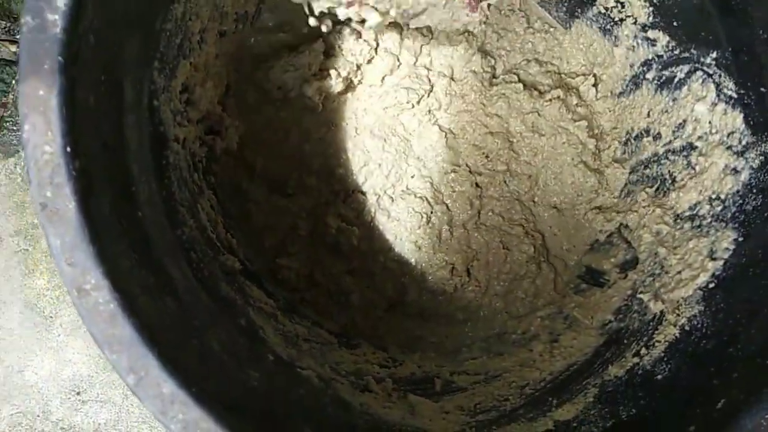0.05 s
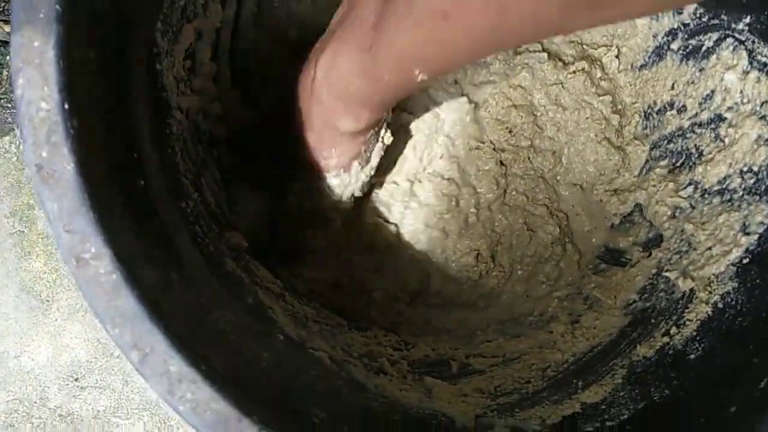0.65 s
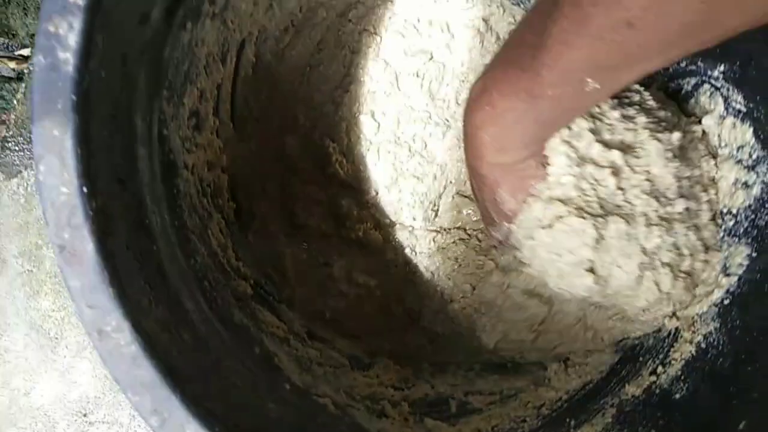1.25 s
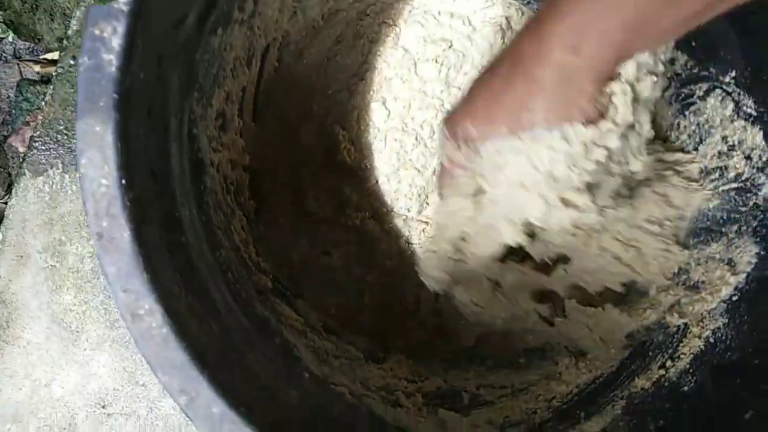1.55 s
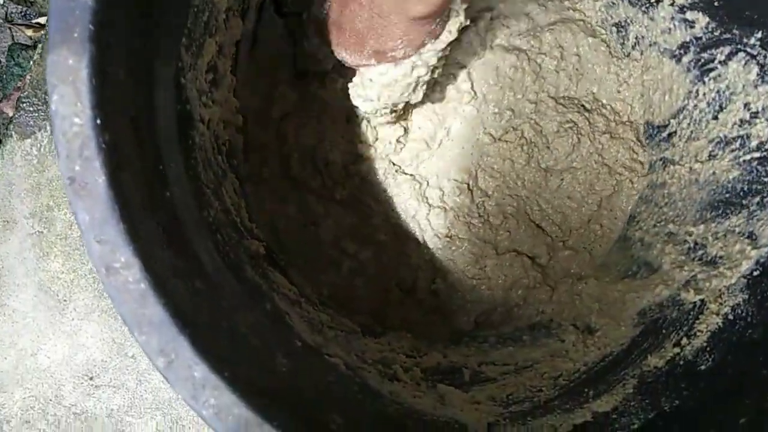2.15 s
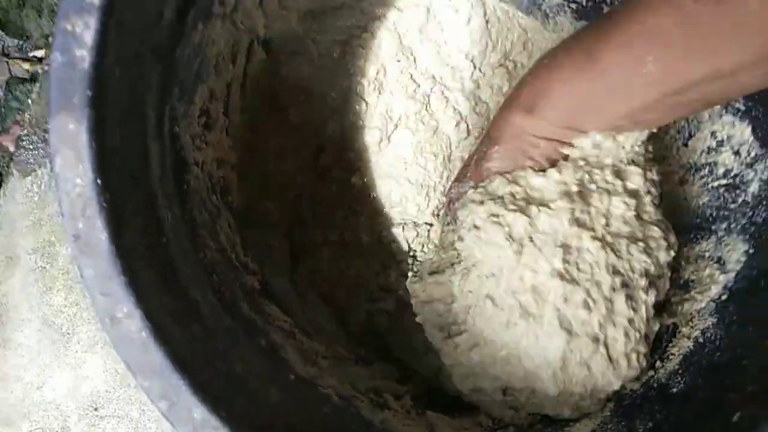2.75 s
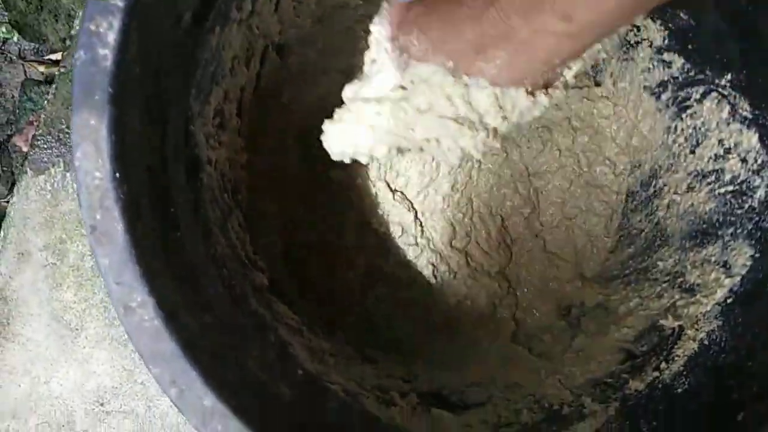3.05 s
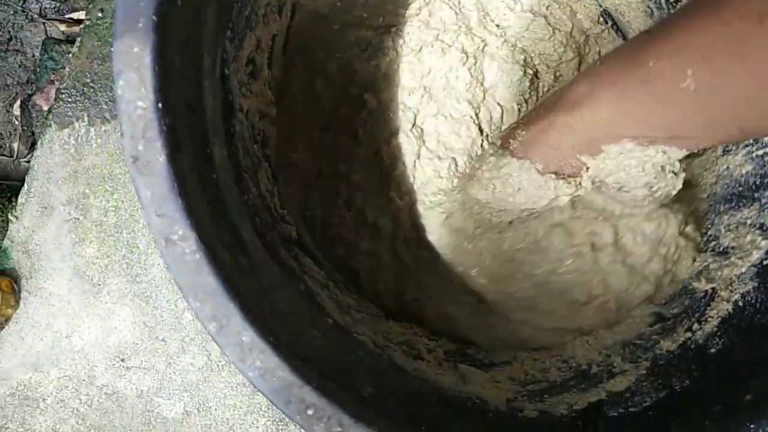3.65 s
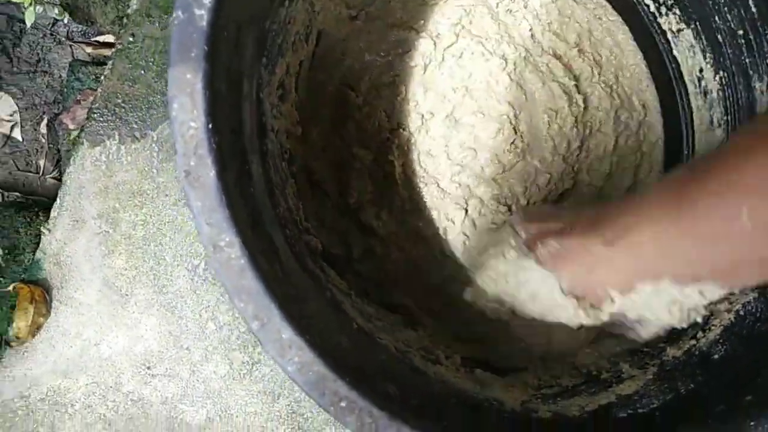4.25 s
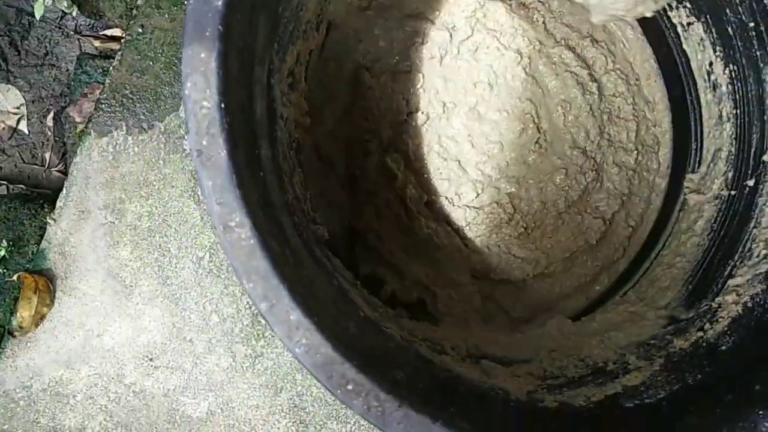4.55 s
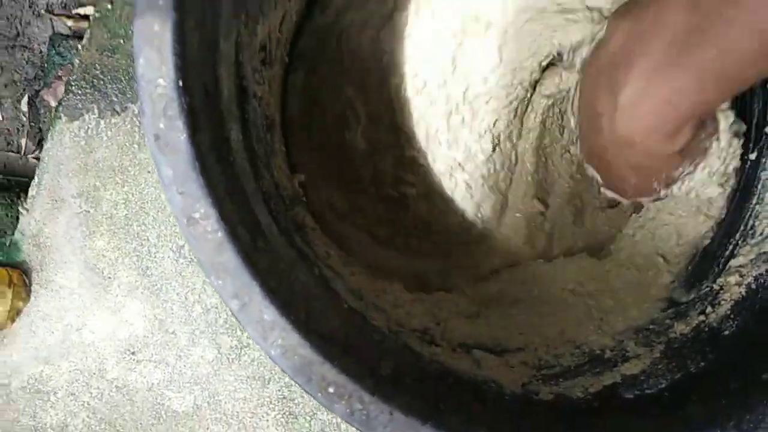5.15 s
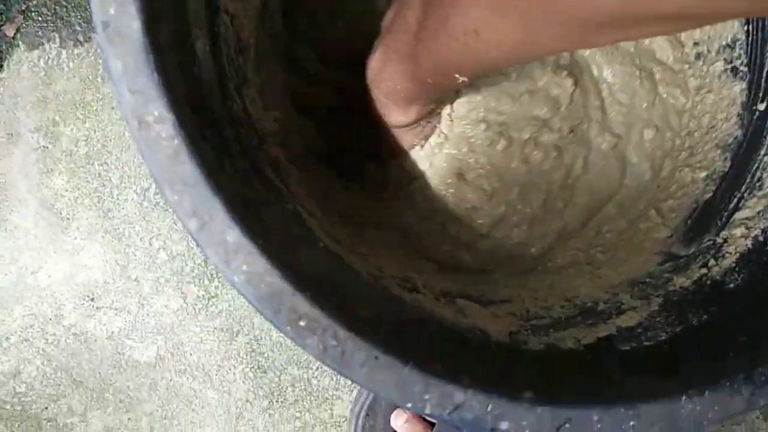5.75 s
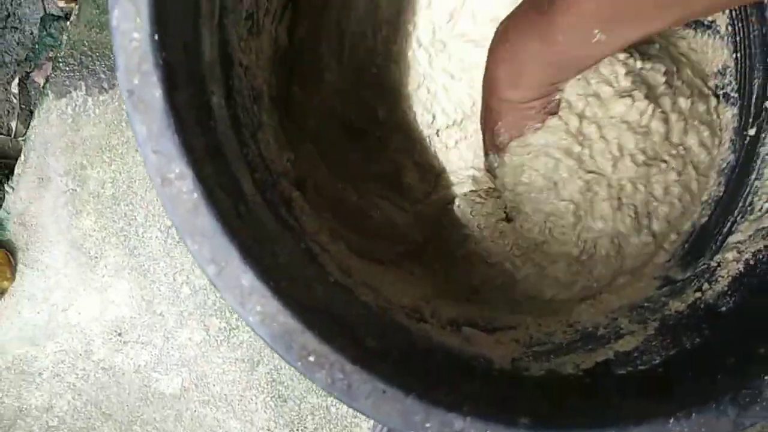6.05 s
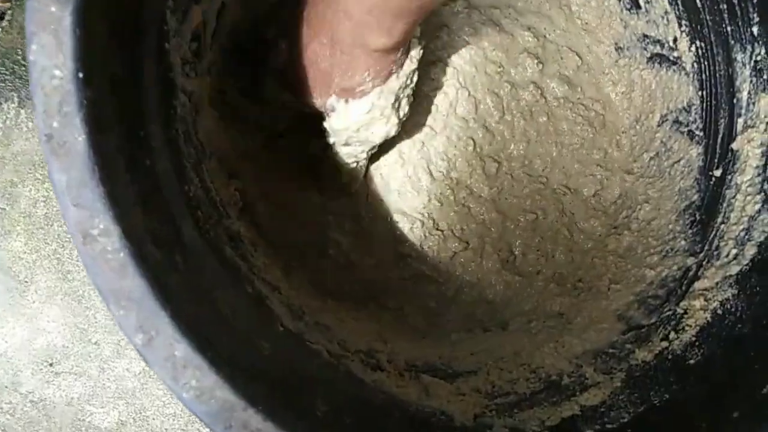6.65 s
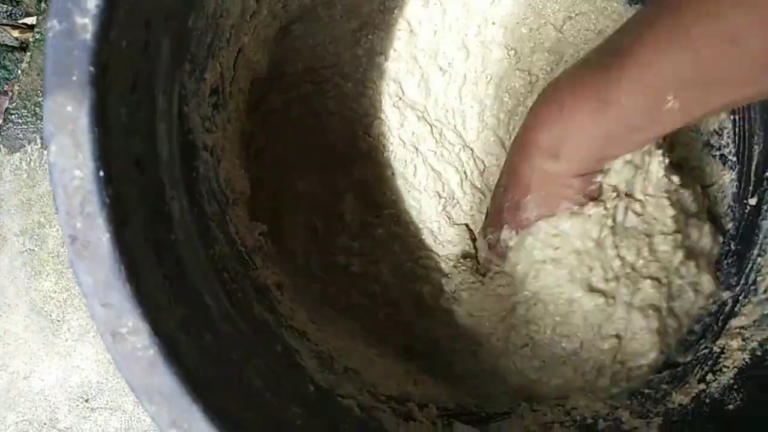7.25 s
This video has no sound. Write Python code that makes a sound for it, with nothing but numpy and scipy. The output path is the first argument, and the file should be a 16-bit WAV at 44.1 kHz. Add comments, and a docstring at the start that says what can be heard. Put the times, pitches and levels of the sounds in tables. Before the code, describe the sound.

Wet, grainy mash is worked by hand in a big plastic tub, close to the microphone. It rasps against the wall with each push, squishes and pops in the fist, then drops in sticky slaps that knock the tub dully. The strokes repeat irregularly throughout, with small birds whistling gliding notes over a quiet, low outdoor rumble.

```python
"""A yard, close to a large plastic basin: a hand scoops and squeezes wet bran mash. Mono.
Each stroke makes grains slip, rub the wall and crackle; mash squirts between the fingers.
Bursting wet films ring air pockets; clumps slap and thud down, and the basin rings dully.
Behind it, small birds whistle gliding notes over a low outdoor hush."""
import sys
import numpy as np
from scipy import signal
from scipy.io import wavfile
from scipy.ndimage import uniform_filter1d

SR = 44100
rng = np.random.default_rng(int(sys.argv[2]) if len(sys.argv) > 2 else 0)


def master(y):
    """Save y as 16-bit WAV."""
    cut = np.clip(np.atleast_2d(y).T, -1, 1)
    pcm = np.round(cut * 32767)  # scale
    wavfile.write(sys.argv[1], SR, pcm.astype(np.int16))


N = 330309

# Event levels are relative: each layer applies its own gain.
# outdoor hush: (frequency [Hz], gain [dB])
YARD_SPECTRUM = [(20, -33), (55, -4.5), (75, -3.5), (110, 6), (170, 0.5), (250, -7.5), (340, -7.5),
                 (500, -14.5), (2200, -18), (4600, -23.5), (9000, -42), (16000, -36)]
# one near bird's rising call: (time [s], level [dB])
RISING_CALLS = [(0.596, -52.5), (1.36, -51), (2.155, -53), (4.705, -50.5), (5.576, -51), (6.139, -60),
                (6.99, -61)]
# other near birds' falling chirps: (time [s], start pitch [Hz], level [dB])
FALLING_CHIRPS = [(.275, 2296, -58), (.385, 2376, -59.5), (1.59, 5000, -58.5), (2.02, 2574, -54),
                  (2.868, 2762, -49.5), (3.823, 3230, -57.5), (5.42, 5230, -57.5), (6.901, 5140, -57)]
# mash-filled basin: (frequency [Hz], bandwidth [Hz], gain [dB])
BASIN_MODES = [(253, 150, -18), (336, 33, 2), (367.8, 27, 4.5), (615, 220, -8), (750, 82, -2.5),
               (950, 200, -15)]
# treble loss of the basin: (frequency [Hz], gain [dB])
BASIN_ROLLOFF = [(90, 1.5), (200, 0.5), (950, -0.5), (2500, -6.5), (8000, -71.0)]
# mash lands or shifts against the basin: (time [s], peak [dB], nominal pitch [Hz])
MASH_THUDS = [(0.058, -40.5, 97.5), (0.289, -40.5, 92), (0.553, -46, 233), (0.765, -47, 84.4),
              (1.08, -42.5, 190), (1.142, -47, 79), (1.359, -42, 83), (2.603, -43, 89), (3.347, -32, 314),
              (4.41, -40.5, 94), (5.015, -35, 230), (6.268, -43, 90)]
# blows that set the whole basin humming: (time [s], level [dB])
HUM_BLOWS = [(1.755, -48.5), (2.127, -56), (3.341, -50.5)]
# jets of mash: (time [s], length [s], gap resonance start [Hz], end [Hz], bandwidth [Hz], level [dB])
FINGER_SQUIRTS = [(.715, 0.083, 1650, 1690, 1700, -49), (2.349, 0.059, 1270, 755, 260, -55),
                  (3.471, .23, 4500, 2520, 2700, -47.5), (4.075, 0.076, 1370, 1620, 1680, -48),
                  (4.846, .11, 3320, 1620, 900, -46.5), (5.722, 0.15, 1030, 610, 220, -58)]
# hand pushes through the mash: (time [s], length [s], wall rub [dB], rasp [dB], crackle [dB])
HAND_STROKES = [(0.583, 0.14, -56.5, -50, -67.5), (0.707, 0.13, -49, -51, -66),
                (0.87, 0.22, -54.5, -59, -77), (1.035, .25, -47.5, -52.5, -69),
                (1.355, 0.21, -56.5, -62.5, -77), (2.186, 0.16, -53, -50, -67),
                (2.335, 0.37, -45.5, -50, -73.5), (2.629, .08, -44, -46, -69),
                (3.384, 0.23, -56, -58, -62.5), (3.472, 0.2, -53, -46.5, -63),
                (3.656, 0.11, -46.5, -50, -64), (4.088, .21, -49.5, -44.5, -61.5),
                (4.304, 0.075, -52.5, -53, -66), (4.651, 0.27, -51.5, -49.5, -71.5),
                (4.74, 0.17, -47.5, -40.5, -59), (4.925, .13, -47.5, -46, -70),
                (5.113, 0.085, -51, -48, -71), (5.558, 0.071, -48.5, -49, -57.5),
                (5.714, 0.083, -44.5, -52.5, -75.5), (5.964, .1, -53, -56, -75),
                (6.069, 0.1, -45.5, -47, -75), (6.85, 0.016, -45, -49, -75),
                (6.916, 0.092, -56.5, -76, -71), (7.21, 0.12, -48, -52.5, -79.5)]
# fist kneads a lifted lump: (time [s], length [s], crackle [dB])
FIST_KNEADS = [(0, 0.51, -66.5), (1.978, 0.23, -63.5), (3.216, 0.12, -67), (3.878, 0.15, -64),
               (4.528, 0.067, -65.5), (5.434, 0.078, -70), (6.512, 0.16, -61.5), (7.366, .05, -66.5)]
# grain on grain: (frequency [Hz], gain [dB])
RASP_SPECTRUM = [(300, -41), (700, -15.5), (950, -7.5), (1130, 6), (1350, 0), (1620, 5.5), (1950, 0.5),
                 (2300, 4), (3200, -4), (4500, -6), (7000, -15.5), (15000, -48)]
# wet ticks: (frequency [Hz], gain [dB])
CRACKLE_SPECTRUM = [(1000, -37), (3000, 0), (6500, -3), (8200, -1.5), (10000, -9), (16000, -15)]
# spit of bursting films: (frequency [Hz], gain [dB])
SPIT_SPECTRUM = [(2500, -35), (5400, 1.5), (8200, 3), (10500, -7), (16000, -9)]
# soft mash muffles an air pocket: (frequency / pocket pitch [ratio], gain [dB])
POCKET_MUFFLING = [(0.18, -22), (0.39, -5), (0.9, 0), (1.28, 0), (2.34, -14), (4.8, -28)]
# clumps land in the basin: (time [s], knock [dB], pocket [dB], spit [dB], burst time scale [s])
CLUMP_SLAPS = [(0.552, -38, -44.5, -57, .0004), (1.072, -42.5, -50, -62, 0.0051),
               (1.7532, -40, -30.5, -36.5, 0.0023), (1.825, -56.5, -49, -56, .0004),
               (2.118, -53, -44, -45, 0.0017), (2.1267, -46, -41, -41, 0.001),
               (2.135, -42.5, -43, -45.5, 0.0016), (2.157, -55, -49.5, -47, .001),
               (2.351, -43, -48, -55.5, .0026), (2.535, -47.5, -50.5, -51.5, 0.007),
               (3.0092, -50.5, -50.5, -52.5, 0.0018), (3.0588, -44, -40.5, -46, 0.0019),
               (3.167, -56, -51.5, -44, 0.0022), (3.342, -50.5, -45.5, -46.5, 0.0077),
               (3.384, -59, -54, -55, 0.00092), (3.957, -49.5, -50.5, -56, .0055),
               (3.979, -50, -47.5, -48.5, 0.003), (4.628, -47.5, -52, -59.5, 0.005),
               (5.012, -39.5, -42, -53.5, 0.0017), (5.575, -52.5, -52, -56, 0.004),
               (6.4655, -49.5, -36, -35, 0.0014), (6.5345, -52.5, -52.5, -45, 0.0012),
               (6.6624, -56.5, -50, -43, 0.0034)]
# pockets burst in the fist: (time [s], pocket [dB], spit [dB], pitch [Hz], burst time scale [s])
POCKET_POPS = [(0.096, -52.5, -58, 3420, 0.005), (0.45, -54, -55, 3800, 0.0032),
               (0.545, -51.5, -53, 3100, 0.011), (1.733, -51, -51, 3700, 0.0056),
               (1.8146, -60, -55, 3500, .002), (2.105, -49, -72, 2760, 0.002),
               (2.1644, -47.5, -49, 3300, .0013), (3.059, -35, -43, 4500, 0.0014),
               (3.114, -51.5, -48.5, 3300, .0013), (3.2583, -42, -58, 4140, 0.0078),
               (3.4323, -51, -57, 2740, .001), (4.04, -57.5, -58, 4000, 0.0012),
               (4.861, -44.5, -50, 3320, 0.0077), (5.3933, -45, -57.5, 2950, 0.0025),
               (5.621, -46, -65, 3430, .016), (5.68, -51.5, -57, 2500, .0012),
               (6.177, -48, -68, 2300, 0.00045), (6.586, -50.5, -61, 3460, 0.0014),
               (6.799, -49.5, -55.5, 3280, 0.0081), (6.829, -51.5, -50, 3300, 0.005),
               (7.386, -52, -77, 3550, .0011)]
# floor between strokes: (wall rub [dB], rasp [dB], crackle [dB])
FLOOR_DB = (-73, -73, -77)
# level change over one stroke: (wall rub [dB], rasp [dB], crackle [dB])
STROKE_CHANGE_DB = (-2, -1, -2)


def gain_of(db):
    """Decibels to amplitude."""
    return 10 ** (np.asarray(db) / 20)


def unit_rms(x):
    """Scale to rms 1."""
    return x / np.sqrt(np.mean(x ** 2) + 1e-20)


def steadied(x, size=3000):
    """Hold short-term power at 1, keeping the grain."""
    return x / np.sqrt(abs(uniform_filter1d(x ** 2, size)) + 1e-9)


def add(mix, start_s, sound):
    """Mix a sound in from start_s on."""
    part = mix[max(round(start_s * SR), 0):][:len(sound)]
    part += sound[:len(part)]


def colour(x, spectrum, size=2048):
    """Minimum-phase filter through (frequency [Hz], gain [dB]) points."""
    hz, db = np.transpose(spectrum)
    bin_hz = abs(np.fft.fftfreq(size, 1 / SR))
    log_gain = np.log(gain_of(np.interp(np.log(bin_hz + 1), np.log(hz), db)))
    taps = np.fft.ifft(np.exp(np.conj(signal.hilbert(log_gain)))).real
    return signal.oaconvolve(x, taps[:size // 2])[:len(x)]


def resonate(x, hz, width_hz):
    """One resonance, peak gain 1."""
    q = hz / min(width_hz, SR / 4)
    return signal.lfilter(*signal.iirpeak(min(hz, SR / 2 - 1), q, SR), x)


def moving_resonance(x, hz, width_hz):
    """Swept band-pass: shift hz to zero, smooth twice, shift back."""
    carrier = np.exp(2j * np.pi * np.cumsum(hz) / SR)
    pole = np.exp(-np.pi * width_hz / SR)
    baseband = signal.lfilter([(1 - pole) ** 2], [1, -2 * pole, pole * pole], x / carrier)
    return 2 * (carrier * baseband).real


def wander(per_s, count=N):
    """Random drift, rms 1."""
    knots = np.arange(count) * per_s / SR
    return unit_rms(np.interp(knots, np.arange(count), rng.standard_normal(count)))


def grains(per_s, spread_db, count=N):
    """Random clicks of either sign, mostly small, a few large."""
    size = gain_of(spread_db * np.minimum(rng.exponential(1, count), 4))
    return size * rng.choice([-1, 1], count) * (rng.random(count) < per_s / SR)


def echoes(x, t60_s, delay_s):
    """Decaying scatter of reflections, unit energy."""
    t = np.arange(SR) / SR
    scatter = rng.standard_normal(SR) * (rng.random(SR) < .1)
    taps = scatter * gain_of(-60 * t / t60_s) * (t > delay_s)
    return signal.oaconvolve(x, taps / np.linalg.norm(taps))[:N]


def yard(level_db=-57, drift_db=1.5):
    """Outdoor hush and low rumble, drifting in level."""
    level = gain_of(level_db + drift_db * wander(3.4))
    return level * unit_rms(colour(rng.standard_normal(N), YARD_SPECTRUM, size=8192))


def whistle(length_s, first_hz, last_hz, flutter=0.0462):
    """One bird note: a fluttering glide, fastest at the start."""
    count = round(length_s * SR)
    glide_hz = first_hz + (last_hz - first_hz) * np.linspace(0, 1, count) ** .75
    hz = glide_hz * (1 + flutter * wander(1500, count))
    return unit_rms(np.sin(2 * np.pi * np.cumsum(hz) / SR) * signal.windows.tukey(count, .5))


def birds(far_count=170):
    """Near whistles over distant falling chirps, smeared by the yard's walls."""
    near, far = np.zeros(N), np.zeros(N)
    for start_s, db in RISING_CALLS:
        add(near, start_s, gain_of(db) * whistle(length_s=0.16, first_hz=4160, last_hz=7190))
    for start_s, hz, db in FALLING_CHIRPS:
        add(near, start_s, gain_of(db) * whistle(length_s=.08, first_hz=hz, last_hz=.78 * hz))
    for slot, (jitter, long, low, loud) in enumerate(rng.random((far_count, 4))):
        hz = 5400 - 2200 * low ** 2
        chirp = gain_of(-69.5 + 4.2 * loud) * whistle(.07 + .09 * long, hz, .8 * hz)
        add(far, (slot + jitter) / far_count * N / SR, chirp)
    return 0.51 * near + 0.72 * echoes(near + far, t60_s=0.42, delay_s=0.0015)


def basin_hum(hz=94.5, t60_s=2.4, attack_s=0.0031):
    """The whole basin hums on in its lowest mode after a blow."""
    out, t = np.zeros(N), np.arange(2 * SR) / SR
    for start_s, db in HUM_BLOWS:
        envelope = gain_of(db - 60 * t / t60_s) * (1 - np.exp(-t / attack_s))
        add(out, start_s, envelope * np.sin(2 * np.pi * hz * (t + start_s)))
    return out


def basin_wall(x):
    """Ring the wall's damped modes."""
    ring = sum(gain_of(db) * resonate(x, hz, width_hz) for hz, width_hz, db in BASIN_MODES)
    return colour(ring, BASIN_ROLLOFF)


def thuds():
    """The mash's weight hits the basin: a few dull cycles, sagging in pitch."""
    out, t = np.zeros(N), np.arange(2 * SR) / SR
    for peak_s, db, hz in MASH_THUDS:
        rise_s = 2.01 / hz
        pitch_hz = hz * (0.788 + 0.434 * np.exp(-t / (2 * rise_s)))
        envelope = gain_of(db) * (t / rise_s) ** 2 * np.exp(2 - 2 * t / rise_s)
        add(out, peak_s - rise_s, envelope * np.sin(2 * np.pi * np.cumsum(pitch_hz) / SR))
    return out


def squirts():
    """Wet grains forced through a gap whose resonance moves as the fist closes."""
    out = np.zeros(N)
    for start_s, length_s, first_hz, last_hz, width_hz, db in FINGER_SQUIRTS:
        count = round(length_s * SR)
        gap_hz = np.geomspace(first_hz, last_hz, count)
        jet = moving_resonance(grains(8000, 1.0, count), gap_hz, width_hz)
        add(out, start_s, gain_of(db) * unit_rms(jet * signal.windows.tukey(count, .8)))
    return out


def cavities(x, depth_db, size=512):
    """Gaps between hand and mash open and close, lifting and hollowing patches of the spectrum."""
    spectra = signal.stft(x, nperseg=size)[2]
    patches = uniform_filter1d(rng.standard_normal(spectra.shape), size=3, axis=0)
    patches = unit_rms(uniform_filter1d(patches, size=7, axis=1))
    return signal.istft(spectra * gain_of(depth_db * patches), nperseg=size)[1][:len(x)]


def wet_ticks(per_s=140, spread_db=3.5, fade_s=0.001, bands=10, size=500):
    """Small wet films snap in bunches, each a brief fizz around one band."""
    out, t = np.zeros(N), np.arange(size) / SR
    for hz in np.geomspace(3000, 12000, bands):
        fizz = rng.standard_normal(size) * t * np.exp(-t / (fade_s * rng.uniform(0.38, 1.27)))
        tick = unit_rms(resonate(fizz, hz, .5 * hz) + .5 * fizz)
        out += signal.oaconvolve(grains(per_s / bands, spread_db), tick)[:N]
    return unit_rms(out * gain_of(2.4 * wander(27)))


def push(start_s, length_s, db, change_db, grip_s=0.027, settle_db_per_s=175):
    """Envelope of one hand movement: grip, carry on, let the mash settle."""
    t = np.arange(N) / SR - start_s
    grip = np.clip(t / grip_s + .5, 0, 1)
    slope_db = change_db * (np.clip(t / length_s, 0, 1) - .5)
    settle_db = settle_db_per_s * np.maximum(t - length_s, 0)
    return grip * gain_of(db + slope_db - settle_db)


def hand_envelopes():
    """Wall rub, rasp and crackle each follow the strongest movement under way."""
    wall, rasp, wet = (np.full(N, gain_of(db)) for db in FLOOR_DB)
    for start_s, length_s, *levels_db in HAND_STROKES:
        for envelope, db, change_db in zip((wall, rasp, wet), levels_db, STROKE_CHANGE_DB):
            envelope[:] = np.maximum(envelope, push(start_s, length_s, db, change_db))
    for start_s, length_s, db in FIST_KNEADS:
        wet = np.maximum(wet, push(start_s, length_s, db, change_db=0))
    return wall, rasp, wet


def strokes():
    """Bran grains slip in clumps against the wall and each other, among wet ticks."""
    wall, rasp, wet = hand_envelopes()
    stick_slip = gain_of(1.8 * wander(130))
    slips = grains(per_s=9000, spread_db=2.5) * stick_slip
    wall_ring = basin_wall(slips * gain_of(2 * wander(45)))
    rubbing = cavities(wall_ring, depth_db=3.5, size=1024)
    scrapes = grains(per_s=12000, spread_db=1.7) * stick_slip
    rasping = cavities(colour(scrapes, RASP_SPECTRUM), depth_db=3.5)
    crackle = colour(wet_ticks() + 0.62 * unit_rms(slips), CRACKLE_SPECTRUM)
    return (gain_of(-2.0) * wall * steadied(rubbing)
            + gain_of(-2.5) * rasp * steadied(rasping)
            + gain_of(9.0) * wet * steadied(crackle, size=5000))


def squelch(peak_s, knock_db, pocket_db, spit_db, hz, burst_s, lead_s=0.02, size=4410):
    """A volley of bursting films rings an air pocket and knocks the basin. Returns (start [s], sound)."""
    t = np.arange(size) / SR - lead_s
    swell = np.exp(-abs(t) / (max(burst_s, .0005) * np.where(t < 0, .85, 1.1)))
    # sticky threads part just after, with smaller snaps
    for lag, share in rng.random((3, 2)):
        swell += 0.12 * share * np.exp(-abs(t - .005 - .04 * lag) / 0.001)
    volley = swell * (grains(7000, 3.8, size) + 0.52 * rng.standard_normal(size))
    ring = resonate(volley, hz, width_hz=0.59 * hz)
    undertone = 0.12 * resonate(volley, .5 * hz, width_hz=0.28 * hz)
    pocket = colour(ring + undertone, [(ratio * hz, db) for ratio, db in POCKET_MUFFLING])
    spit = cavities(colour(volley, SPIT_SPECTRUM), depth_db=6.0)
    parts = (knock_db, basin_wall(volley)), (pocket_db, pocket), (spit_db, spit)
    return peak_s - lead_s, sum(gain_of(db) * unit_rms(part) for db, part in parts) / np.sqrt(10)


def slaps_and_pops(pocket_hz=1994, knock_db_per_octave=27):
    """Heavier slaps trap larger, lower pockets; pops in the fist leave the basin still."""
    out = np.zeros(N)
    for peak_s, knock_db, pocket_db, spit_db, burst_s in CLUMP_SLAPS:
        hz = pocket_hz * 2 ** ((pocket_db - knock_db) / knock_db_per_octave)
        add(out, *squelch(peak_s, knock_db, pocket_db, spit_db, hz, burst_s))
    for peak_s, pocket_db, spit_db, hz, burst_s in POCKET_POPS:
        add(out, *squelch(peak_s, -np.inf, pocket_db, spit_db, hz, burst_s))
    return out


def scene():
    """Mash and its reflections inside the basin, the yard around it; two equal channels."""
    mash = gain_of(5.65) * slaps_and_pops() + strokes() + squirts()
    early = gain_of(-11.5) * echoes(mash, t60_s=0.041, delay_s=.002)
    late = gain_of(-20.5) * echoes(mash, t60_s=0.066, delay_s=0.012)
    return np.tile(mash + early + late + thuds() + basin_hum() + birds() + yard(), (2, 1))


def record(dry):
    """Steep low-pass."""
    cutoff_hz = 15900
    taps = signal.firwin(301, cutoff_hz, window=("kaiser", 9), fs=SR)
    return signal.oaconvolve(dry, taps[None], "same")


dry = scene()
out = record(dry)
master(out)
```